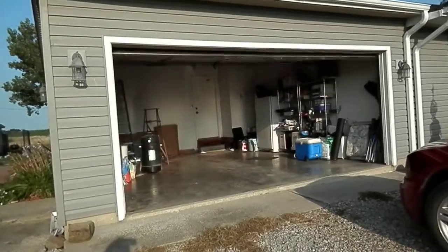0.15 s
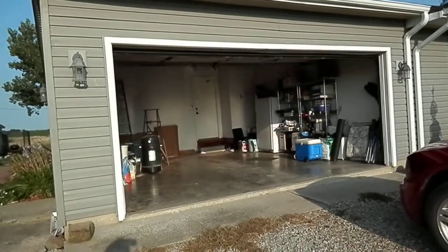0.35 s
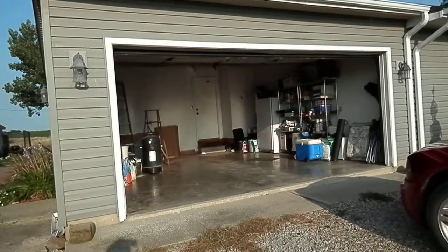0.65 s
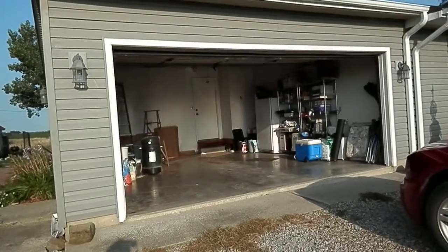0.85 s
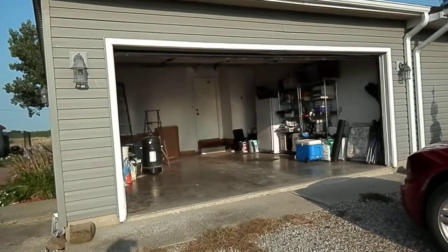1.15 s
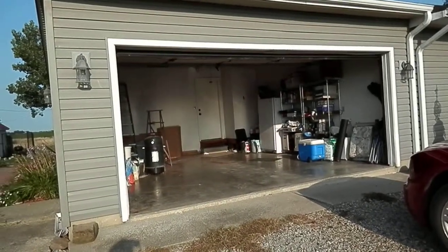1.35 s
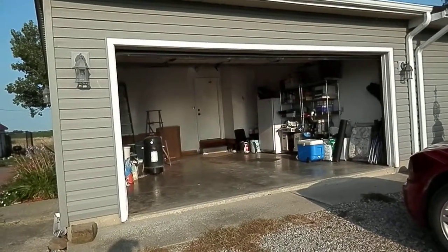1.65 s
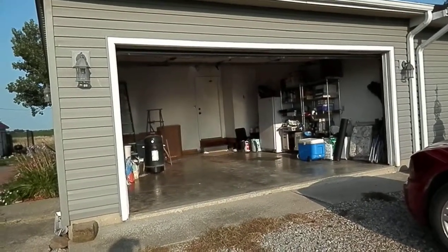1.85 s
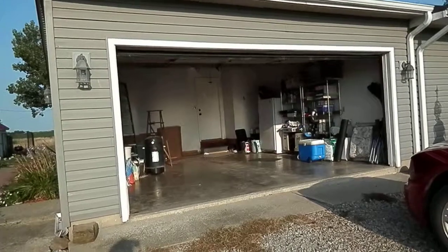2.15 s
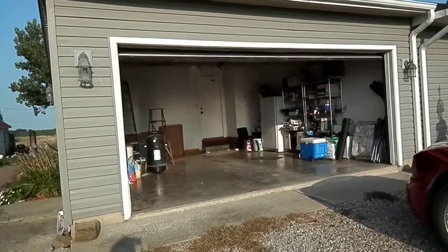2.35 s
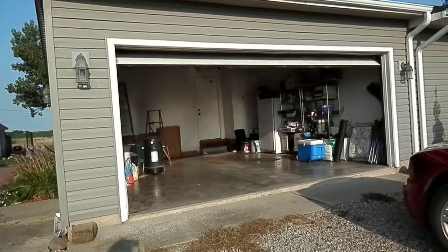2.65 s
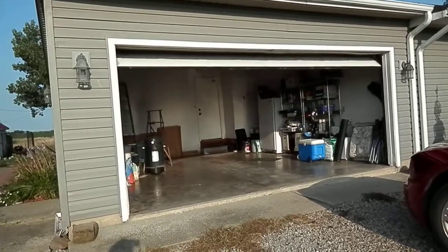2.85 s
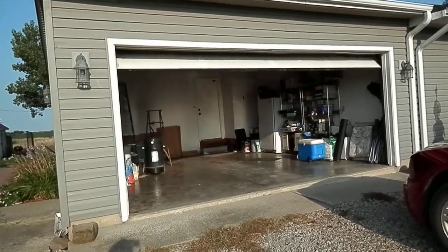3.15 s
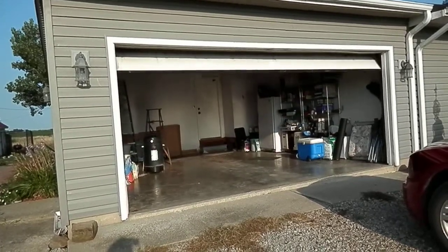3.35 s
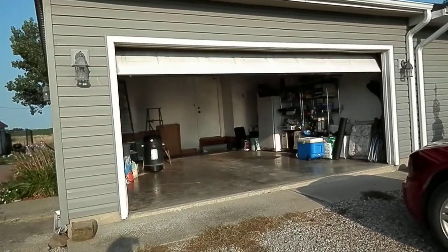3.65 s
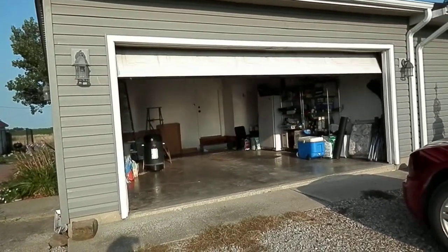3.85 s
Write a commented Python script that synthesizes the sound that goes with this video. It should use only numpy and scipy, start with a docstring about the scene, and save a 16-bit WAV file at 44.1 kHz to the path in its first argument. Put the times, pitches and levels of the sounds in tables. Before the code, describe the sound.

An electric garage door rumbles and stops with a clank. A few dry knocks sound close by over faint birds, then the motor restarts and the door lowers, humming and rattling, heard from the driveway.

```python
"""An electric garage door opener, heard from the driveway, stops at the top, rests, then lowers the door.
Its motor hums at twice the mains frequency; jolts excite the panels and hinges, rollers scrape in
their steel tracks, and the garage reverberates. In the pause a few dry knocks ring close by as damped
modes. Small birds chirp in gliding tones over faint ticks, a low outdoor drone and puffs of wind."""
import sys
import numpy as np
from scipy import signal
from scipy.fft import rfft, irfft
from scipy.io import wavfile

SR = 44100
rng = np.random.default_rng(int(sys.argv[2]) if len(sys.argv) > 2 else 0)


def unload_audio(sound):
    """Save the sound as a 16-bit wav file, at the path given as the first command line argument."""
    columns = np.transpose(np.atleast_2d(sound))
    # keep every value between -1 and 1, then stretch to whole-number steps
    steps = np.round(np.clip(columns, -1, 1) * 32767)
    wavfile.write(sys.argv[1], SR, steps.astype(np.int16))


N = 176400
T = np.arange(N) / SR

HUM_HZ, GARAGE_T60_S = 120, 0.54
# motor runs: on t/s, off t/s, rise/s, decay/s
LIFTING, LOWERING = (-.1, .18, .05, 0.043), (2.14, 4.2, 0.13, .05)
# hum harmonics, ascending: lifting level/dB, lowering level/dB
HUM_HARMONICS = [(-27.5, -37.5), (-46, -38.5), (-49.5, -43.5), (-58, -55), (-59, -68.5), (-63, -60.5)]
# added gain of the hum's fundamental: t/s, gain/dB
FUNDAMENTAL_GAIN = [(.2, -1), (2.33, 0.5), (2.7, 1.5), (3.43, -2.5), (3.51, -2.5), (3.97, 3)]
# envelopes of panel rumble, hinge rattle and roller scrape: t/s, level/dB
PANEL_ENVELOPE = [(0, -35), (.17, -36), (.34, -40), (.6, -58.5), (2.1, -76.5), (2.16, -37.5), (2.68, -37),
                  (2.85, -42.5), (4, -40)]
HINGE_ENVELOPE = [(0, -39), (.11, -49), (.2, -43), (.28, -43.5), (.42, -60), (.8, -79.5), (2.13, -83),
                  (2.16, -49), (2.65, -46), (2.84, -57.5), (3.0, -47), (3.2, -51.5)]
ROLLER_ENVELOPE = [(0, -63), (.1, -75), (.19, -56), (.26, -55), (.45, -85.5), (2.16, -79.5), (2.3, -61),
                   (2.62, -65), (2.87, -73), (3.03, -64), (3.22, -71.5), (3.33, -64.5), (3.45, -73.5),
                   (3.65, -63), (3.8, -75.5)]
# spectra of the door's parts and the drive's clunk: f/Hz, relative level/dB
PANEL_SPECTRUM = [(60, -10), (105, -3), (165, -8.5), (235, -6.5), (350, -5), (440, -7), (540, -20.5),
                  (720, -25), (2500, -43.5)]
HINGE_SPECTRUM = [(350, -14.5), (550, -6), (700, 0.5), (860, 0), (1080, -12.5), (1500, -15), (1900, -22.5),
                  (2900, -24.5), (8000, -47.5)]
ROLLER_SPECTRUM = [(1200, -22), (2200, 7), (4200, -1), (8600, 2.5), (9800, -8), (12000, -16.5),
                   (14000, -10.5)]
STEEL_SPECTRUM = [(150, -2.5), (400, 3.5), (850, 1.5), (1200, -6), (4200, -7.5), (8600, -10.5),
                  (11500, -22), (15000, -33)]
CLUNK_SPECTRUM = [(250, 4), (1000, 11), (2500, -24)]
# clanks of the sections: t/s, level/dB, rise/s, decay/s, tilt/(dB per octave)
DOOR_CLANKS = [(0.152, -34, 0.0044, 0.046, -7.5), (.248, -56, .004, 0.0045, 21),
               (2.615, -60.5, 0.0064, 0.027, 6), (2.926, -41.5, 0.041, 0.058, -2.5),
               (3.855, -53, 0.0027, 0.012, -3)]
# natural frequencies of the steel tracks: f/Hz
TRACK_MODES = [2270, 2502, 2860, 2900]
# roller squeaks: t/s, f/Hz, level/dB, half-width/s
ROLLER_SQUEAKS = [(2.373, 8620, -59.5, 0.01)]
# close knocks: t/s, level/dB, decay/s, most strongly excited f/Hz
CLOSE_KNOCKS = [(1.069, -41.5, 0.0024, 1250), (1.1075, -49, .002, 1800), (1.111, -37.5, 0.0044, 1270),
                (1.126, -42, 0.0019, 1150), (1.139, -44.5, 0.0028, 1100), (1.1577, -37.5, 0.0018, 1010),
                (1.192, -37.5, 0.0023, 1070), (1.8574, -32, .0036, 750), (1.8598, -24.5, 0.002, 1460),
                (1.9013, -34.5, 0.0018, 1340), (1.938, -40.5, 0.0026, 1100), (1.9418, -27.5, 0.0014, 1300)]
# their modes: f/Hz, relative level/dB, decay time as a multiple of the knock's
HOLLOW_MODES = [(717, -3, 1.2), (1039, 0, 1.26), (1480, -9, 1.24), (1790, -19, 0.37), (2560, -5, .6)]
# spectra of a knock's noisy tail and of a tick: f/Hz, relative level/dB
KNOCK_TAIL_SPECTRUM = [(550, 0), (1400, 4.5), (2200, -13), (3500, -16), (7500, -25.5)]
TICK_SPECTRUM = [(600, 10.5), (1300, -10), (2100, -10.5), (3500, -21), (6500, -26)]
# faint ticks: t/s, level/dB
FAINT_TICKS = [(0.422, -50.5), (0.554, -53), (.649, -55), (.689, -50.5), (1.221, -54.5), (1.309, -55),
               (1.557, -54), (1.792, -54.5)]
# arched chirps: t/s, relative level/dB, rasp as a fraction of frequency
BIRD_CHIRPS = [(0.504, -70, 0.019), (0.824, -60.5, .012), (1.161, -65, 0.009), (1.5, -64, 0.01),
               (1.868, -68, .013), (2.485, -64, 0.05), (3.835, -65.5, 0.042)]
# slurred notes: t/s, duration/s, initial f/Hz, final f/Hz, arch height/Hz, level/dB
BIRD_SLURS = [(0.437, 0.065, 3600, 2660, 497, -76), (0.604, 0.026, 4660, 4850, 396, -77),
              (0.921, 0.036, 4000, 4930, 150, -77.5), (1.466, 0.075, 5080, 2590, 148, -75),
              (1.55, 0.056, 3360, 2500, 875, -74.5)]
# low outdoor rumble, plus a faint, very high hiss near 15 kHz (last two points): f/Hz, relative level/dB
BACKGROUND_SPECTRUM = [(20, 5), (85, -3), (130, -2), (290, 2), (440, -13), (880, -22.5), (1500, -42),
                       (4000, -47.5), (6500, -56), (8300, -46), (11000, -80), (15300, -39.5)]
# low drones and thin, insect-like shrills: f/Hz, half-width/Hz, level/dB
DRONE_BANDS = [(133.9, 9.5, -58.5), (194, 9.5, -59), (298.3, 6.6, -58)]
INSECT_BANDS = [(3670, 110, -86), (8400, 240, -89)]
# wind puffs: t/s, level/dB, half-width/s
WIND_PUFFS = [(1.943, -45.5, 0.076), (3.26, -44, 0.087), (3.476, -36, .03)]


def motor(waver_hz=5.6, waver_rad=0.32, waver_db=1.38):
    """Forced vibration at twice the mains frequency; each harmonic wavers as the door shakes and moves."""
    def gate(on, off, rise, decay):
        return np.clip((T - on) / rise, 0, 1) * np.exp(-np.maximum(T - off, 0) / decay)

    out = 0
    for order, (lifting_db, lowering_db) in enumerate(HUM_HARMONICS, 1):
        phase = 2 * np.pi * (order * HUM_HZ * T + rng.random())
        phase += waver_rad * np.sqrt(order) * wander(waver_hz)
        level = amp(lifting_db) * gate(*LIFTING) + amp(lowering_db) * gate(*LOWERING)
        if order == 1:
            level *= envelope(FUNDAMENTAL_GAIN)
        level *= amp(waver_db * np.sqrt(order) * wander(waver_hz))
        out += np.sqrt(2) * level * np.sin(phase)
    return out


def drive_clunk():
    """Impact excitation: the drive takes up its slack and jerks the door."""
    return amp(-39) * fade(start=2.153, decay=0.033) * colour(noise(), CLUNK_SPECTRUM)


def door():
    """Random impact excitation: jolts shake panels and hinges, and rollers grind along the tracks."""
    rumble = colour(in_garage(impacts(per_s=500, scatter_db=1.5), direct_db=-8), PANEL_SPECTRUM)
    rattle = colour(in_garage(impacts(per_s=240, scatter_db=3.5), direct_db=-4.5), HINGE_SPECTRUM)
    scrape = colour(in_garage(impacts(per_s=900, scatter_db=9), direct_db=-9), ROLLER_SPECTRUM)
    return (rumble * envelope(PANEL_ENVELOPE) + rattle * envelope(HINGE_ENVELOPE)
            + scrape * envelope(ROLLER_ENVELOPE))


def clanks(ring_db=-9.5):
    """Resonance: sections clatter as they fold over the bend, and the tracks ring on in their modes."""
    clatter = 0
    for start, db, rise, decay, tilt_db in DOOR_CLANKS:
        burst = np.clip((T - start) / rise, 0, 1) * np.exp(-np.maximum(T - start - rise, 0) / decay)
        jolts = in_garage(impacts(per_s=300, scatter_db=2), direct_db=-10)
        clatter += amp(db) * burst * colour(jolts, STEEL_SPECTRUM, tilt_db)
    track_response = fade(start=0, decay=0.013) * sum(np.sin(2 * np.pi * hz * T) for hz in TRACK_MODES)
    return clatter + amp(ring_db) * convolve(clatter, track_response)


def roller_squeak():
    """Phase modulation roughens the brief, high tone of a roller."""
    return sum(amp(db) * swell(at, half_width) * np.sin(2 * np.pi * hz * T + wander(150))
               for at, hz, db, half_width in ROLLER_SQUEAKS)


def knocks(contact_s=0.00063, octave_loss_db=14, detune_spread=0.066):
    """Damped free vibration: each dry, hollow knock excites chiefly the modes near one frequency."""
    out, tail = 0, amp(-25.5) * colour(noise(), KNOCK_TAIL_SPECTRUM)
    # each knock lands on a slightly different spot
    detunes = 1 + detune_spread * rng.standard_normal((len(CLOSE_KNOCKS), len(HOLLOW_MODES)))
    for (start, db, decay, centre_hz), shifts in zip(CLOSE_KNOCKS, detunes):
        ring = 0
        for (hz, mode_db, decay_ratio), shift in zip(HOLLOW_MODES, shifts):
            gain = amp(mode_db - octave_loss_db * np.log2(hz / centre_hz) ** 2)
            ring += gain * fade(start, decay * decay_ratio) * np.sin(2 * np.pi * hz * shift * (T - start))
        contact = np.clip((T - start) / contact_s, 0, 1)
        out += amp(db) * contact * (ring + tail * fade(start, decay=0.013))
    return out


def ticks():
    """Exponentially damped noise transients, heard as small ticks close by."""
    level = sum(amp(db) * fade(start, decay=0.011) for start, db in FAINT_TICKS)
    return colour(noise(), TICK_SPECTRUM) * level


def birds(chirp_s=.047, crest_hz=6190, dip_hz=2120, crest_fraction=.54):
    """Frequency modulation: one bird repeats an arched chirp, others slur raspy notes; the yard echoes."""
    flutter = wander(350)

    def note(progress, hz, db, rasp):
        phase = 2 * np.pi * np.cumsum(hz * (1 + rasp * flutter)) / SR
        return amp(db) * np.sqrt(2) * np.sin(np.pi * progress) * np.sin(phase)

    chirps = slurs = 0
    for start, db, rasp in BIRD_CHIRPS:
        progress = np.clip((T - start) / chirp_s, 0, 1)
        chirps += note(progress, crest_hz - dip_hz * (progress / crest_fraction - 1) ** 2, db, rasp)
    for start, duration, from_hz, to_hz, arch_hz, db in BIRD_SLURS:
        progress = np.clip((T - start) / duration, 0, 1)
        hz = from_hz + (to_hz - from_hz) * progress + arch_hz * np.sin(np.pi * progress)
        slurs += note(progress, hz, db, rasp=0.056)
    return amp(-3) * chirps + slurs + amp(4) * reverb(chirps / 2 + slurs, t60=0.14)


def background():
    """Filtered noise: outdoor drones, shrills and low rumble, plus a faint, very high hiss."""
    bands = 0
    for hz, width, db in DRONE_BANDS + INSECT_BANDS:
        phase = 2 * np.pi * hz * T
        bands += amp(db) * (wander(width) * np.sin(phase) + wander(width) * np.cos(phase))
    return bands + amp(-47.5) * colour(noise(), BACKGROUND_SPECTRUM) * amp(1.4 * wander(9.8))


def wind():
    """Low-frequency pressure fluctuations: light puffs thump the microphone."""
    buffeting = colour(noise(), [(15, 4.5), (32, 13.5), (60, 1.5), (120, -30)])
    return buffeting * sum(amp(db) * swell(at, half_width) for at, db, half_width in WIND_PUFFS)


def in_garage(x, direct_db):
    """Superposition of direct sound and reverberation, whose paths change as the door moves."""
    turn = np.pi * T
    reflected = np.cos(turn) * reverb(x, GARAGE_T60_S) + np.sin(turn) * reverb(x, GARAGE_T60_S)
    return amp(direct_db) * x + reflected


def reverb(x, t60):
    """Diffuse reflections that decay by 60 dB in t60 seconds."""
    return convolve(x, noise() * fade(0, t60 / np.log(1000)))


def convolve(x, response):
    """Convolution with an impulse response scaled to unit energy."""
    return signal.fftconvolve(x, response / np.linalg.norm(response))[:N]


def impacts(per_s, scatter_db):
    """A Poisson train of blows with log-normal sizes; rms 1."""
    return unit_rms((rng.random(N) < per_s / SR) * np.sign(noise()) * amp(scatter_db * noise()))


def colour(x, spectrum, tilt_db=0):
    """Spectral shaping by (f/Hz, level/dB) points, a tilt per octave and 24 dB/octave skirts; rms 1."""
    hz, db = np.array(spectrum).T
    octave, knots = np.log2(np.fft.rfftfreq(N, 1 / SR) + 1), np.log2(hz)
    shape_db = np.interp(octave, knots, db) + tilt_db * np.maximum(octave - knots[0], 0)
    skirts_db = 24 * np.abs(octave - np.clip(octave, knots[0], knots[-1]))
    return unit_rms(irfft(rfft(x) * amp(shape_db - skirts_db), N))


def wander(rate_hz):
    """Smooth random fluctuation from low-passed noise; rms 1."""
    lowpass = np.exp(-(np.fft.rfftfreq(N, 1 / SR) / rate_hz) ** 2)
    return unit_rms(irfft(rfft(noise()) * lowpass, N))


def envelope(points):
    """Gain interpolated between (t/s, level/dB) points."""
    return amp(np.interp(T, *np.array(points).T))


def fade(start, decay):
    """Exponential decay from a given onset; times in seconds."""
    return (T >= start) * np.exp(-np.maximum(T - start, 0) / decay)


def swell(at, half_width):
    """Gaussian pulse; times in seconds."""
    return np.exp(-((T - at) / half_width) ** 2)


def noise():
    return rng.standard_normal(N)


def amp(db):
    return 10 ** (np.asarray(db) / 20)


def unit_rms(x):
    return x / np.sqrt(np.mean(x ** 2) + 1e-30)


def scene():
    """Linear superposition of all sources in one channel."""
    garage = motor() + drive_clunk() + door() + clanks() + roller_squeak()
    return (garage + knocks() + ticks() + birds() + background() + wind())[None]


def record(dry):
    """Band limiting: a steep elliptic low-pass at 15750 Hz."""
    return signal.sosfilt(signal.ellip(10, .2, 80, 15750, fs=SR, output="sos"), dry)


dry = scene()
out = record(dry)
unload_audio(out)
```